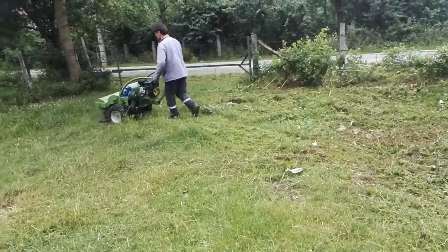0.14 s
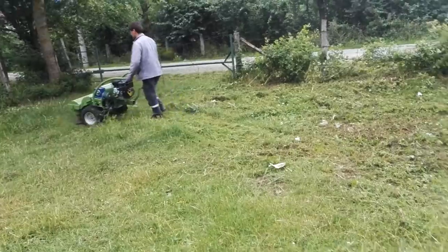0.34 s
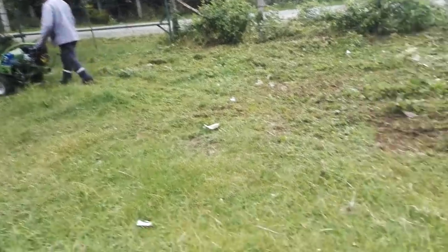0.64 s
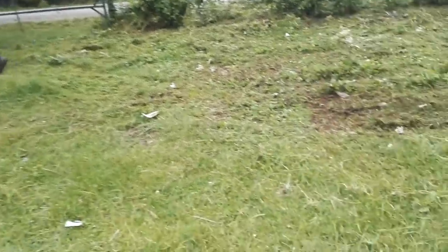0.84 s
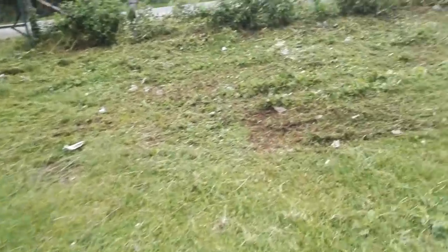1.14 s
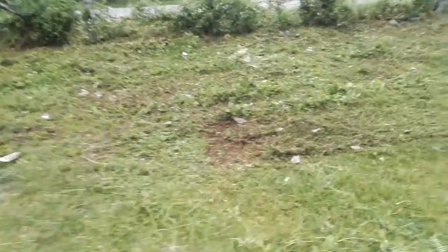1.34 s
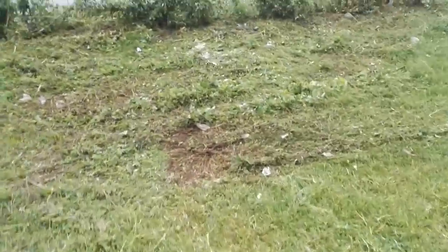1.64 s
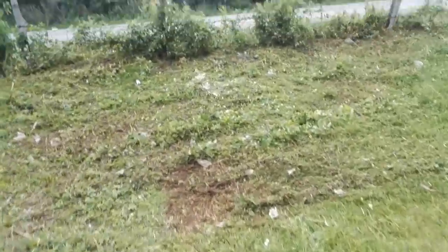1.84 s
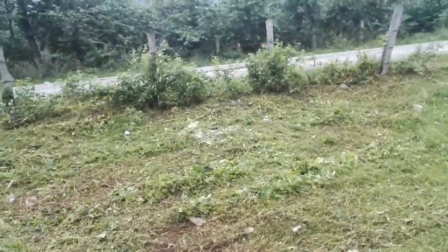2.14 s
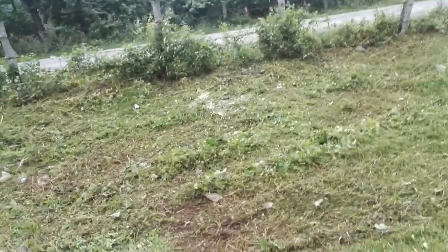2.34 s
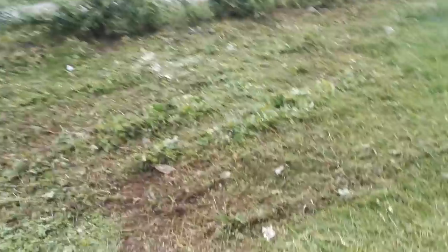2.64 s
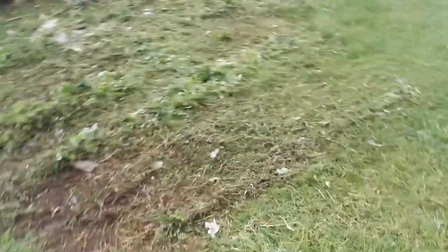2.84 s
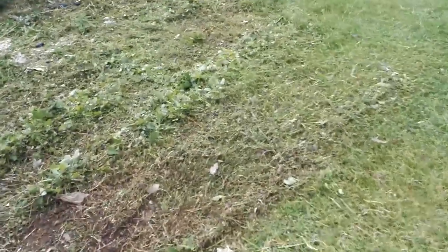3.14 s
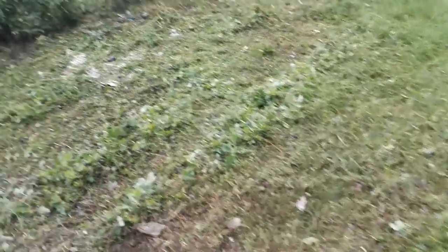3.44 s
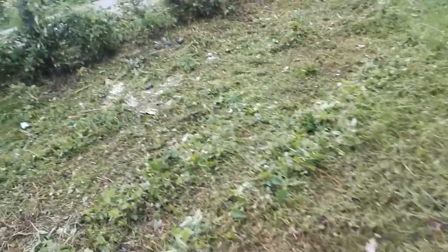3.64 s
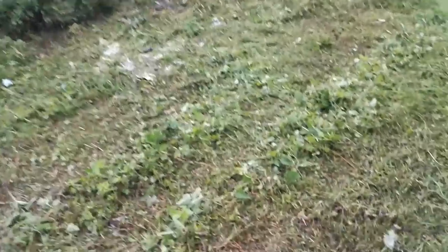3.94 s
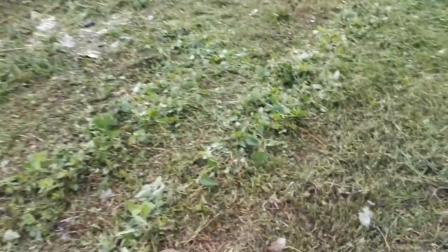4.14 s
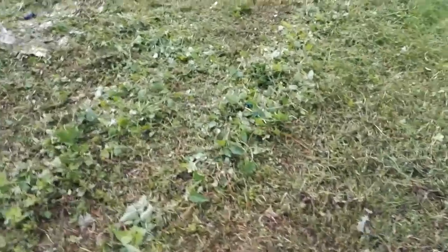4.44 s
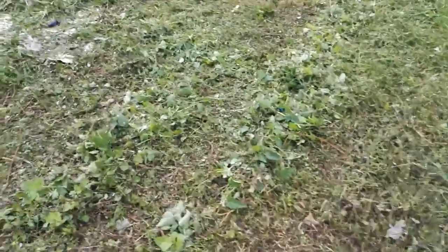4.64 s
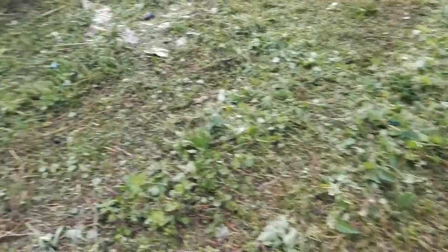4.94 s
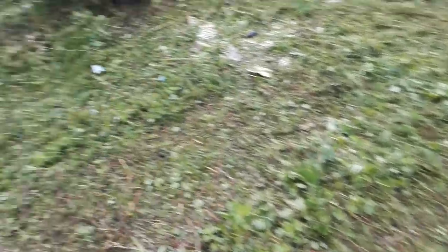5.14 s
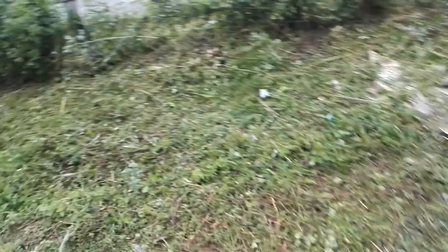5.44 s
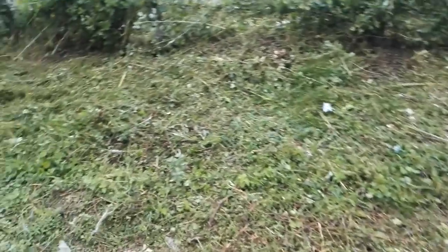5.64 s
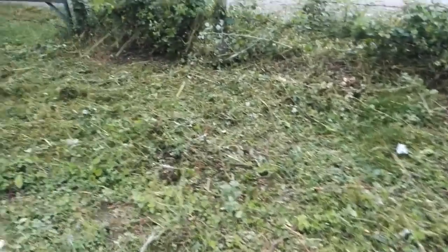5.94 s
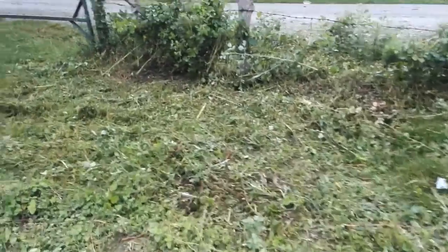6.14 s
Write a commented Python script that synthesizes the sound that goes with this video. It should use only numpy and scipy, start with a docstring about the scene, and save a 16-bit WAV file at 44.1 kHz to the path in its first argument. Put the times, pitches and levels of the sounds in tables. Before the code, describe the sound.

Continuous small-engine drone, a rapid low thudding under buzzy gear whine, sheet-metal drumming and bright clatter, with grass hissing under chain flails. Occasional stalks snap sharply. The pitch dips under load, recovers, then dips deeper while a short loud burst of shredding and flung debris breaks through. The engine climbs back to speed. Open field, moderate distance, heard on a turning handheld phone with dry outdoor sound and limited top treble.

```python
"""Flail mower in a field, heard on a turning phone

A walk-behind flail mower works some way to the left of a hand-held phone that turns away to the right.
Its single cylinder thuds about 32 times a second as summed partials of the firing rate, with puffs of noise.
Gear teeth whine as tones locked to the engine; deck, casing and cut grass are filtered noise and tiny impacts.
The engine sags under load, twice deeply; the second time the chains tear loudly through a thick clump."""
import sys
import numpy as np
from scipy import signal
from scipy.fft import rfft, irfft, next_fast_len
from scipy.io import wavfile
from scipy.ndimage import map_coordinates

SR = 44100
rng = np.random.default_rng(int(sys.argv[2]) if len(sys.argv) > 2 else 0)


def bounce(signal):
    """Save signal as a 16-bit WAV file at the path given by the first command-line argument."""
    frames = np.transpose(np.atleast_2d(signal))
    limited = np.clip(frames, -1, 1)
    pcm = np.round(limited * 32767).astype(np.int16)
    wavfile.write(sys.argv[1], SR, pcm)


N = 277389
TIME = np.arange(N) / SR
SIZE = next_fast_len(N, True)
FREQ = np.maximum(np.arange(SIZE // 2 + 1) * SR / SIZE, 1)

# In every spectrum below, relative_db gives the shape only; the level is set where it is used.
# In every resonance, width_hz is the full width 3.5 dB below the peak.

# Load from thicker grass; negative sags let the engine run up: start_s, slowing_s, sag_hz (firings per second)
LOADS = [(0.255, 0.24, 0.77), (1.25, 0.49, 1.16), (2.37, 0.3, 3), (3.375, 0.44, 1.4), (4.45, .24, 3.5),
         (5.3, 0.411, -0.3)]
# Free-running firing rate, its slow creep, and the time scale of the governor's recovery
GOVERNED_HZ, CREEP_HZ_PER_S, RECOVER_S = 32.5, 0.126, 0.395
# Per Hz of sag: lift of the low exhaust partials, the gas puffs, and the teeth dragging the engine down
THROTTLE_DB_PER_SAG_HZ, PUFF_DB_PER_SAG_HZ, WHINE_DB_PER_SAG_HZ = 1, 0.5, 0.4
# The other parts, thud apart, get louder with speed; the deck fades as it moves off into the grass
SPEED_DB_PER_HZ, DECK_FADE_DB_PER_S = 0.46, 4
# Uneven grass makes hiss and clatter waver together
DENSITY_DB, DENSITY_HZ = 0.5, 14

# The phone's bearing to the mower: time_s, angle_deg (0 is facing it)
BEARING = [(0, 14.2), (.4, 15.5), (1, 48.4), (1.5, 62), (2.4, 85.6), (2.75, 100), (3, 115), (4.05, 112),
           (4.45, 130.6), (4.92, 137), (5.35, 111), (5.8, 90.7), (6.29, 83)]
# Each part as the phone turns, before the trims in its source:
# part (name), facing_db, turned_away_db, lobe_angle_deg, lobe_db
PART_LEVELS = [("thud", -36.5, -39, 75, 1), ("puff", -56, -41.5, 74.4, 7.5),
               ("deck", -34.5, -31.5, 26, 0.69), ("whine", -38, -36, 75.7, 8.9),
               ("rattle", -38.5, -32, 53.5, 13.9), ("screech", -37, -37.5, 126, 2.5),
               ("squeal", -31, -34, 18, 6.7), ("guard", -36, -37, 78, 5.6),
               ("clatter", -28.5, -27, 78.7, -6.5), ("hiss", -28.5, -32.5, 73, 1)]
# Half-width of a lobe (to 1/e); the angle where the mower falls behind, and how gradually
LOBE_DEG, AWAY_DEG, AWAY_SPREAD_DEG = 24.4, 80.6, 14

# Partials of the exhaust note: multiple (of the firing rate), relative_db
EXHAUST_PARTIALS = [(1, -21), (2, -4.5), (3, -6), (4, -7), (5, 3.5), (6, 1.5), (7, -14), (8, 3), (9, -19),
                    (10, -12), (11, -13), (12, -23.5), (13, -23)]
# Rough rumble of exhaust gas: pitch_hz, relative_db
GAS_SPECTRUM = [(25, -20), (70, -36), (120, -16), (170, 1.5), (240, 8.5), (290, 3.5), (360, -5.5),
                (450, -33), (800, -40)]
# Puff of gas at each firing: pitch_hz, relative_db
PUFF_SPECTRUM = [(100, -17), (220, -1.5), (300, 0), (360, 4), (430, 0), (510, -8), (800, -44), (2000, -55)]
# Tones of the meshing teeth: multiple (of the tooth rate), relative_db, phase_flutter_rad
GEAR_TONES = [(1, 2, 0.098), (2, -3.5, 0.11), (3, -3, 2.03), (4, -5, 0.57)]
TEETH_PER_FIRING = 26.75
# What the gear housing lets out of the tooth tones: pitch_hz, gain_db
HOUSING_RESPONSE = [(450, -18), (660, -13), (745, -0.5), (795, 3.5), (822, -2.5), (852, 1), (895, -0.5),
                    (930, 4.5), (1100, -1), (1400, -22), (1720, 1), (3500, 2)]
# Gearbox resonances: centre_hz, width_hz, relative_db
GEARBOX_MODES = [(825, 370, -30), (1760, 146, 9.5), (1890, 98, 6.5)]
# Hollow ring out of the clatter: time_s, centre_hz, level_db
HOLLOW_RING = [(1.6, 2000, -38), (2.1, 2106, -34.5), (2.7, 2303, -37.5), (3.1, 2535, -30.5),
               (3.5, 2650, -39.5), (4, 2504, -38), (4.6, 2550, -56)]
HOLLOW_HALF_WIDTH_HZ = 260
# Drumming sheet-steel hood: pitch_hz, relative_db
DECK_SPECTRUM = [(300, -58), (480, -12), (600, 5), (690, 10.5), (800, 6), (950, -5.5), (1450, -11.5),
                 (2000, -12), (4000, -17)]
# Chain guard resonances: centre_hz, width_hz, relative_db
GUARD_RESONANCES = [(1026, 347, 7.5), (1300, 38, 11), (1590, 960, 0)]
# Engine casing resonances: centre_hz, width_hz, relative_db
CASING_MODES = [(2110, 190, -2.5), (2600, 720, -5.5), (3487, 480, 0.5), (4320, 1250, -3)]
# How much of each part's fine pattern comes back at the next firing (0 to 1)
GAS_MEMORY, TEETH_MEMORY, DECK_MEMORY, RATTLE_MEMORY = 0.62, 0.75, 0.54, 0.48

# Hiss of cut blades: pitch_hz, relative_db
GRASS_SPECTRUM = [(500, -3.5), (1100, 4), (2500, 5.5), (4500, 0.3), (6300, 2.5), (8000, 5.5), (10000, 7),
                  (11500, 8), (13500, 3.5), (15000, -37)]
# Lush tufts that swell only the hiss: start_s, length_s, peak_db (before the hiss trim)
LUSH_TUFTS = [(5.92, 0.28, -42)]
# Single stalks snapping: start_s, level_db
STALK_SNAPS = [(.574, -37), (.916, -15), (1.002, -21), (1.751, -20), (2.825, -20), (2.859, -14),
               (2.923, -21), (2.956, -23), (3.019, -21), (4.351, -10.5), (4.367, -16), (5.503, -21)]
# Crack of one snapping stalk: pitch_hz, relative_db
SNAP_SPECTRUM = [(1000, -25), (5000, -23), (10500, 19), (14000, 7)]
# Patches of dry stalks crackling: start_s, length_s, peak_db (before a random waver)
DRY_PATCHES = [(2.76, 0.17, -27.5), (2.95, 0.3, -38)]
# Crackle of dry stalks: pitch_hz, relative_db
CRACKLE_SPECTRUM = [(1000, -37), (4000, -20), (7500, -9), (9500, -6), (10800, 4), (12500, -5), (15000, -24)]
# Chains in a thick clump: start_s, length_s, peak_db (before a random waver)
THICK_CLUMP = [(4.368, 0.38, -16)]
# Tearing grass, also the knocks of hard bits: pitch_hz, relative_db
TEAR_SPECTRUM = [(25, -22), (60, -3), (130, -5.5), (220, 2), (350, 4), (500, -1), (700, -0.5), (1100, 6),
                 (1600, -1), (3700, 5.5), (6500, 1.5), (10000, 3.5), (14000, -1)]
# Hard bits struck by the chains: start_s, level_db
HARD_KNOCKS = [(4.585, -15), (4.616, -20), (4.682, -11), (4.765, -11)]
# Clods of earth thumping on the hood: start_s, level_db
EARTH_CLODS = [(4.655, -28), (4.69, -23)]
# Dull ring of a clod: pitch_hz, relative_db
THUMP_SPECTRUM = [(60, -12), (200, -6), (370, 8), (600, -29), (2000, -50)]
# A patch is bitten into, arches up to a peak at a share of its length, and is released
BITE_S, SWELL_DB, PEAK_SHARE, RELEASE_S = 0.016, 7.5, 0.72, 0.045

# Microphone port colour for the machine: pitch_hz, left_minus_right_db
MACHINE_PORTS = [(200, -0.5), (450, 1), (700, -1.5), (900, -2), (1400, -2), (1800, -7), (2300, -2.5),
                 (2900, -1.5), (3600, -3.5), (5300, 1.5), (8500, 0), (10800, -1), (13500, 2.5)]
# Microphone port colour for the clump: pitch_hz, left_minus_right_db
TEARING_PORTS = [(200, 3), (380, 4), (700, 9), (1300, -5), (4000, -0.5), (6000, 0.5), (8500, 5), (10800, 3),
                 (13500, 5)]
# Scatter off waving grass and bushes: pitch_hz, scattered_minus_direct_db
FIELD_SCATTER = [(30, -13), (100, -28), (300, -23), (900, -9), (1400, -31.5), (2200, -3.5), (4000, 2),
                 (6000, -5), (8500, 2.5), (14000, 9)]
PORT_LAG_MS = 0.4404  # right port behind left, with the mower side-on
LOW_LAG_SHARE, LOW_LAG_HZ = 0.88, 2030  # below this frequency the lag is a little shorter
SHADE_FACING_DB, SHADE_SIDE_DB = -6, 6  # treble left minus right when facing, and what is added side-on
# Echo off the body behind the phone: mid delay, its swing, angle of the longest delay, gain, band edges
BODY_MS, BODY_SWING_MS, BODY_DEG, BODY_DB = 0.818, 0.842, 15.2, -7
BODY_LOW_HZ, BODY_TOP_HZ = 480, 5430
TOP_HZ = 14400  # upper limit of the phone


def undb(db):
    """Decibels to gain."""
    return 10 ** (np.asarray(db) / 20)


def unit(x):
    """Scale to rms 1."""
    return x / np.sqrt(np.mean(x ** 2))


def curves(table):
    """Each column of a timed table, sample by sample."""
    times, *columns = np.transpose(table)
    return [np.interp(TIME, times, column) for column in columns]


def gains(points):
    """A pitch and dB table as a gain at every frequency."""
    hz, db = np.transpose(points)
    return undb(np.interp(np.log(FREQ), np.log(hz), db))


def filtered(x, response):
    """Apply a frequency response."""
    return irfft(rfft(x, SIZE) * response, SIZE)[:N]


def colour(x, points):
    """Shape the spectrum of x, at rms 1."""
    return unit(filtered(x, gains(points)))


def ring(x, modes):
    """Steep-sided resonances side by side, at rms 1."""
    power = 0
    for hz, width_hz, db in modes:
        detuning = hz / (2 * width_hz) * (FREQ / hz - hz / FREQ)
        power = power + undb(2 * db) / (1 + 2 * detuning ** 2) ** 2
    return unit(filtered(x, np.sqrt(power)))


def noise():
    """White noise."""
    return rng.standard_normal(N)


def walk(hz):
    """Smooth random drift up to about hz, rms 1."""
    return unit(filtered(noise(), 1 / (1 + (FREQ / hz) ** 4)))


def grains(per_s, spread_db):
    """Tiny impacts at random moments; a wider spread makes a few much larger than the rest."""
    hits = rng.random(N) < per_s / SR
    sizes = undb(spread_db * np.minimum(rng.exponential(size=N), 5))
    return unit(hits * np.sign(noise()) * sizes)


def stroke(cycle, at, sharpness):
    """A smooth bump once per engine cycle, peak 1."""
    return np.exp(sharpness * (np.cos(2 * np.pi * (cycle - at)) - 1))


def repeating(x, cycle, memory, count=8):
    """Parts strike much alike at each firing, so the pattern of x recurs and slowly changes."""
    turns = np.floor(cycle[-1])
    recurring = x
    for back in range(1, count):
        earlier = np.interp((cycle - back) % turns, cycle, x)
        recurring = recurring + np.clip(memory, 0, 1) ** back * earlier
    return unit(recurring)


def patches(table):
    """Envelope of the chains passing through patches: a quick bite, an arch, a short release."""
    envelope = 0
    for start_s, length_s, peak_db in table:
        since_s = TIME - start_s
        through = np.clip(since_s / length_s, 0, 1)
        bite = np.clip(since_s / BITE_S, 0, 1)
        release = np.exp(-np.maximum(since_s - length_s, 0) / RELEASE_S)
        arch_db = peak_db - SWELL_DB * (through / PEAK_SHARE - 1) ** 2
        envelope = envelope + bite * release * undb(arch_db)
    return envelope


def impacts(table, decay_s, spectrum):
    """Short noise bursts that start at once and die away exponentially."""
    envelope = 0
    for start_s, db in table:
        decay = np.exp(-np.abs(TIME - start_s) / decay_s)
        envelope = envelope + undb(db) * (TIME >= start_s) * decay
    return envelope * colour(noise(), spectrum)


def engine_speed():
    """Firings per second: each load slows the engine steadily, then the governor pulls it back."""
    hz = GOVERNED_HZ + CREEP_HZ_PER_S * TIME
    for start_s, slowing_s, sag_hz in LOADS:
        since_s = TIME - start_s
        recovery = np.exp(-(np.maximum(since_s - slowing_s, 0) / RECOVER_S) ** 2)
        hz = hz - sag_hz * np.clip(since_s / slowing_s, 0, 1) * recovery
    return hz


def part_levels(angle, hz):
    """Level in dB of each part, from the angle of the phone and the speed of the engine."""
    away = 1 / (1 + np.exp((AWAY_DEG - angle) / AWAY_SPREAD_DEG))
    db_per_hz = {"thud": 0, "puff": -PUFF_DB_PER_SAG_HZ, "whine": -WHINE_DB_PER_SAG_HZ}
    levels = {}
    for part, facing_db, away_db, lobe_deg, lobe_db in PART_LEVELS:
        turned_db = facing_db + (away_db - facing_db) * away
        beam_db = lobe_db * np.exp(-((angle - lobe_deg) / LOBE_DEG) ** 2)
        speed_db = db_per_hz.get(part, SPEED_DB_PER_HZ) * (hz - GOVERNED_HZ)
        levels[part] = turned_db + beam_db + speed_db
    return levels


def exhaust(cycle, thud_db, puff_db, bass_db):
    """Each firing sends a pressure pulse and a puff of gas out of the muffler."""
    multiples, db = np.transpose(EXHAUST_PARTIALS)
    # the muffler rings after the pulse, never before it: each partial's lag follows from the gains
    log_gain = np.log(undb(np.r_[db[0], db, db[-1], db[::-1]]))
    lags = np.imag(signal.hilbert(log_gain))[1:]
    note = 0
    for k, partial_db, lag in zip(multiples, db, lags):
        gain = undb(partial_db + bass_db / (1 + (k / 4) ** 4))
        note = note + gain * np.cos(2 * np.pi * k * cycle - lag)
    surge = 0.7 + 2.3 * stroke(cycle, at=0.034, sharpness=2.5)
    gas = colour(repeating(noise(), cycle, GAS_MEMORY) * surge, GAS_SPECTRUM)
    burst = 2 + stroke(cycle, at=0.024, sharpness=19.0)
    puff = colour(repeating(noise(), cycle, GAS_MEMORY) * burst, PUFF_SPECTRUM)
    thud = unit(note) * undb(0.5 * walk(5.3)) + undb(-6) * gas
    return undb(thud_db) * thud + undb(puff_db) * puff


def tooth_slap(cycle):
    """Slack teeth slap much alike in every cycle: low-passed noise that recurs."""
    return unit(filtered(repeating(noise(), cycle, TEETH_MEMORY), 1 / (1 + (FREQ / 230) ** 2)))


def gear(cycle, whine_db, rattle_db, screech_db, squeal_db):
    """Meshing teeth whine; the crank jolts the box at each firing and each turn, adding side tones."""
    turn = 2 * np.pi * (cycle - 0.07)
    mesh = TEETH_PER_FIRING * turn
    jolt = 0.37 * np.sin(turn) + 0.48 * np.sin(2 * turn + 0.77)
    load = 0.88 + 0.24 * np.cos(2 * turn) + 0.35 * stroke(cycle, at=0.07, sharpness=9)
    # slapping spreads a row of side tones around each tone
    slack = 1 + undb(-12.0) * (tooth_slap(cycle) + 1j * tooth_slap(cycle))
    # the first tone comes off the gear, the second off its box; the upper ones beam out
    levels = (whine_db, rattle_db, screech_db, squeal_db)
    tones = 0
    for (k, tone_db, flutter), level_db in zip(GEAR_TONES, levels):
        phase = k * mesh - jolt + flutter * walk(20.0)
        tones = tones + undb(tone_db + level_db) * np.imag(slack * np.exp(1j * phase))
    # loose teeth knock and ring the gearbox
    knocks = repeating(grains(per_s=2200, spread_db=-3.5), cycle, RATTLE_MEMORY)
    rattle = undb(rattle_db - 4.0) * ring(knocks, GEARBOX_MODES)
    return load * (filtered(tones, gains(HOUSING_RESPONSE)) + rattle)


def hollow(cycle):
    """A narrow noise band rings out of the clatter, drifting mostly upward, and sinks back."""
    hz, db = curves(HOLLOW_RING)
    phase = 2 * np.pi * np.cumsum(hz) / SR
    band = walk(HOLLOW_HALF_WIDTH_HZ) * np.cos(phase) + walk(HOLLOW_HALF_WIDTH_HZ) * np.sin(phase)
    pulsing = 2 + stroke(cycle, at=0.02, sharpness=1.4)
    return undb(db) * unit(band * pulsing)


def deck(cycle, deck_db, guard_db):
    """Chains and cuttings drum on the sheet-steel hood and its guard."""
    pulsing = 1.5 + stroke(cycle, at=0.08, sharpness=6)
    blows = repeating(grains(per_s=3500, spread_db=0.8), cycle, DECK_MEMORY) * pulsing
    hood = undb(deck_db - 1.0) * colour(blows, DECK_SPECTRUM)
    return hood + undb(guard_db) * ring(blows, GUARD_RESONANCES)


def clatter(cycle, clatter_db):
    """Valves, piston and chain links rattle the casing: dense impacts through its resonances."""
    pulsing = 3.2 + stroke(cycle, at=0.02, sharpness=1.5)
    blows = grains(per_s=12000, spread_db=0.0) * pulsing
    return undb(clatter_db - 3.0) * ring(blows, CASING_MODES)


def grass(cycle, hiss_db):
    """Countless blades are cut; the hiss pulses a little with the engine and swells in lush tufts."""
    pulsing = 2.8 + stroke(cycle, at=0.05, sharpness=3)
    cuts = (noise() + 0.69 * grains(per_s=3900, spread_db=2.0)) * pulsing
    level = (undb(hiss_db) + patches(LUSH_TUFTS)) * undb(0.8)
    return level * colour(cuts, GRASS_SPECTRUM)


def stalks():
    """Dry stems splinter in a bright crackle and snap singly."""
    crackle = colour(grains(per_s=7700, spread_db=5.5), CRACKLE_SPECTRUM)
    crackle = crackle * patches(DRY_PATCHES) * undb(1.6 * walk(40))
    return crackle + impacts(STALK_SNAPS, decay_s=0.0011, spectrum=SNAP_SPECTRUM)


def clump():
    """The chains shred a thick tuft and fling hard bits and clods about."""
    shred = colour(noise() + 0.81 * grains(per_s=3000, spread_db=4.0), TEAR_SPECTRUM)
    tearing = shred * patches(THICK_CLUMP) * undb(1.1 * walk(36))
    knocks = impacts(HARD_KNOCKS, decay_s=0.002, spectrum=TEAR_SPECTRUM)
    return tearing + knocks + impacts(EARTH_CLODS, decay_s=0.017, spectrum=THUMP_SPECTRUM)


def delayed(x, ms):
    """Delay by a moving number of milliseconds."""
    return map_coordinates(x, [np.arange(N) - ms * SR / 1000], order=3)


def body_echo(x, angle):
    """The body behind the phone echoes into the left port; the bass bends around the body."""
    delay_ms = BODY_MS + BODY_SWING_MS * np.cos(np.radians(angle - BODY_DEG))
    low_cut = FREQ ** 2 / (FREQ ** 2 + BODY_LOW_HZ ** 2)
    thrown = filtered(x, low_cut / np.sqrt(1 + (FREQ / BODY_TOP_HZ) ** 2))
    return undb(BODY_DB) * delayed(thrown, delay_ms)


def far_port(x, lag_ms):
    """The sound at the right port: late, the treble a little later than the rest."""
    low = filtered(x, 1 / (1 + (FREQ / LOW_LAG_HZ) ** 6))
    return delayed(low, LOW_LAG_SHARE * lag_ms) + delayed(x - low, lag_ms)


def field(x, diffuse, ports, angle):
    """Direct sound x reaches the left port first; scatter, drawn from diffuse(), differs at each port."""
    sideways = np.sin(np.radians(angle))
    lag_ms = PORT_LAG_MS * sideways
    shade_db = SHADE_FACING_DB + SHADE_SIDE_DB * sideways ** 2
    share, tilt = gains(FIELD_SCATTER), gains(ports)
    # keeps the summed power when the ports are tilted and the scatter is added
    balance = np.sqrt(2 / (1 + tilt ** 2) / (1 + share ** 2))
    left, right = x + body_echo(x, angle), far_port(x, lag_ms)
    out = []
    for direct, side, sign in ((left, tilt, 1), (right, 1, -1)):
        heard = filtered(direct + filtered(diffuse(), share), side * balance)
        # the body of the phone shades only the treble
        treble = filtered(heard, FREQ ** 2 / (FREQ ** 2 + 4500 ** 2))
        out.append(heard + (undb(sign * shade_db / 2) - 1) * treble)
    return np.array(out)


def scene():
    """One crankshaft drives every part of the machine; the phone turns away from it."""
    hz, angle = engine_speed(), curves(BEARING)[0]
    cycle = np.cumsum(hz * (1 + 0.001925 * walk(11.13))) / SR  # firings so far, slightly unsteady
    db, density_db = part_levels(angle, hz), DENSITY_DB * walk(DENSITY_HZ)
    bass_db = THROTTLE_DB_PER_SAG_HZ * (GOVERNED_HZ - hz)
    engine = exhaust(cycle, db["thud"], db["puff"], bass_db)
    engine = engine + gear(cycle, db["whine"], db["rattle"], db["screech"], db["squeal"])
    engine = engine + hollow(cycle)

    def cutting():
        """The noisy parts, which also scatter off the field."""
        machine = deck(cycle, db["deck"] - DECK_FADE_DB_PER_S * TIME, db["guard"])
        machine = machine + clatter(cycle, db["clatter"] + density_db)
        return machine + grass(cycle, db["hiss"] + density_db) + stalks()

    mower = field(engine + cutting(), cutting, MACHINE_PORTS, angle)
    return mower + field(clump(), clump, TEARING_PORTS, angle)


def record(dry):
    """The phone cuts the top with a steep low-pass."""
    return signal.sosfilt(signal.ellip(12, 0.1, 80, TOP_HZ, fs=SR, output="sos"), dry)


dry = scene()
out = record(dry)
bounce(out)
```